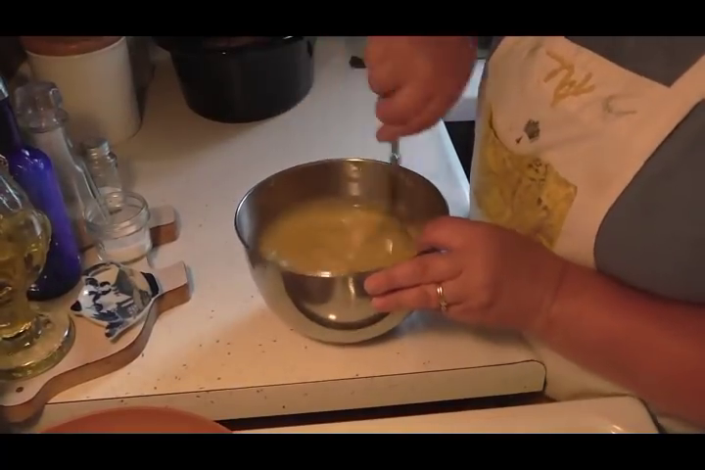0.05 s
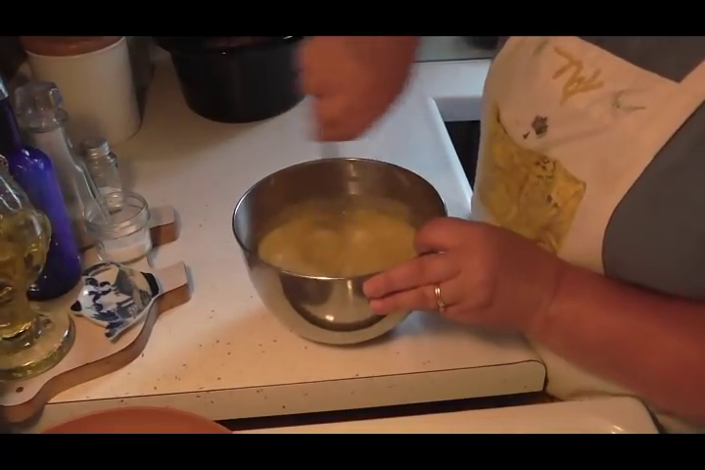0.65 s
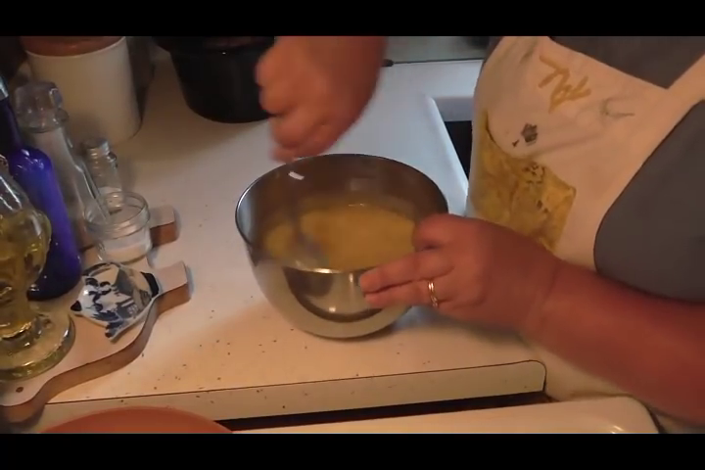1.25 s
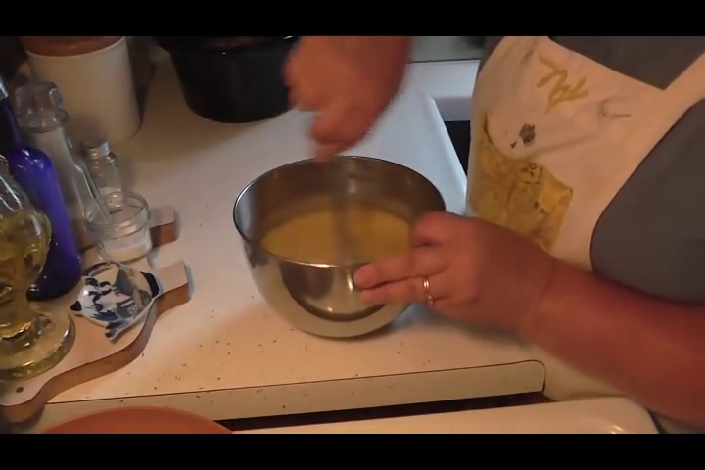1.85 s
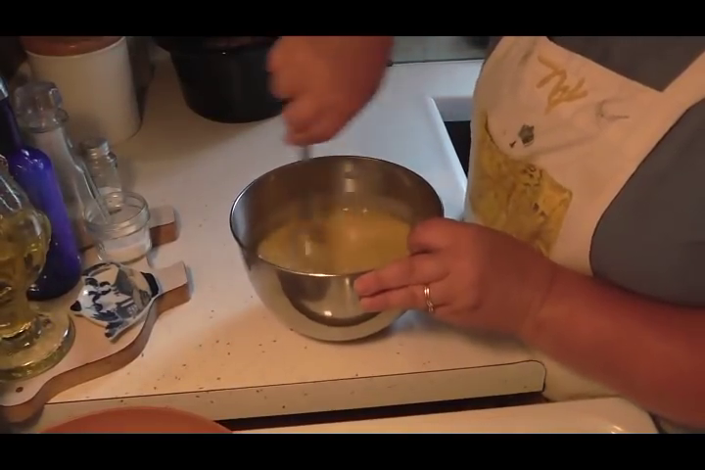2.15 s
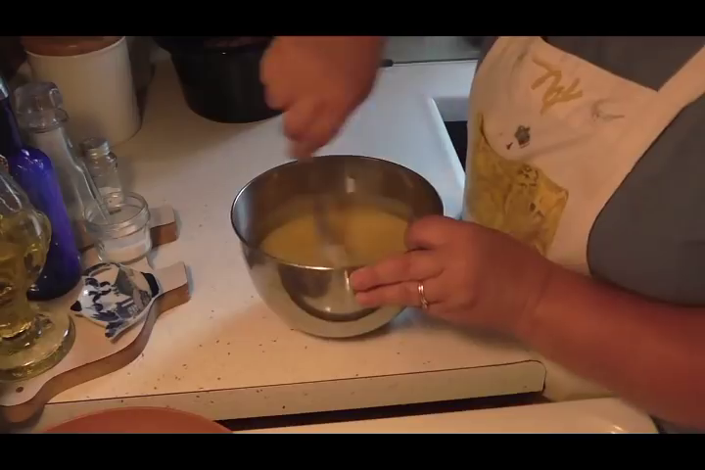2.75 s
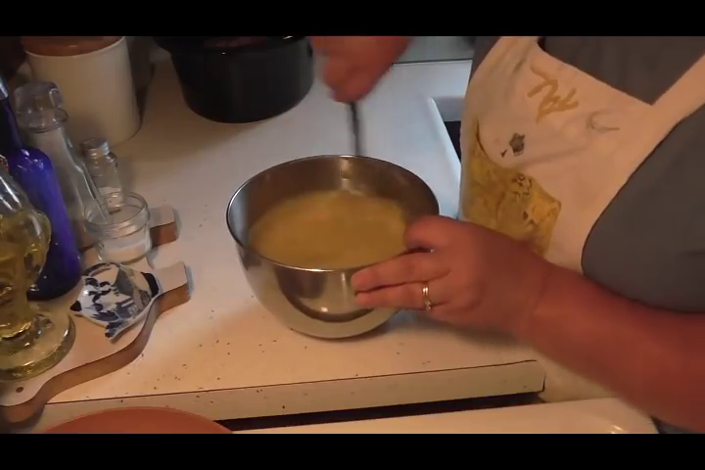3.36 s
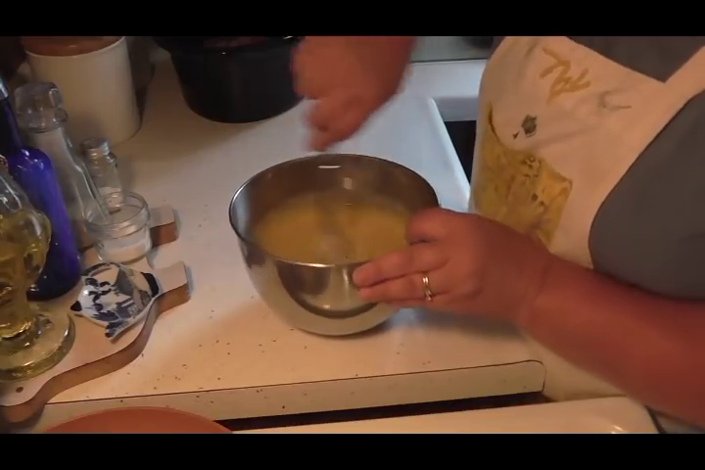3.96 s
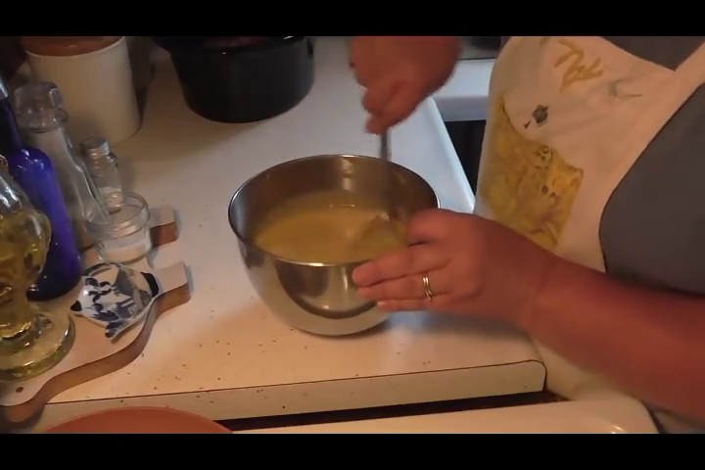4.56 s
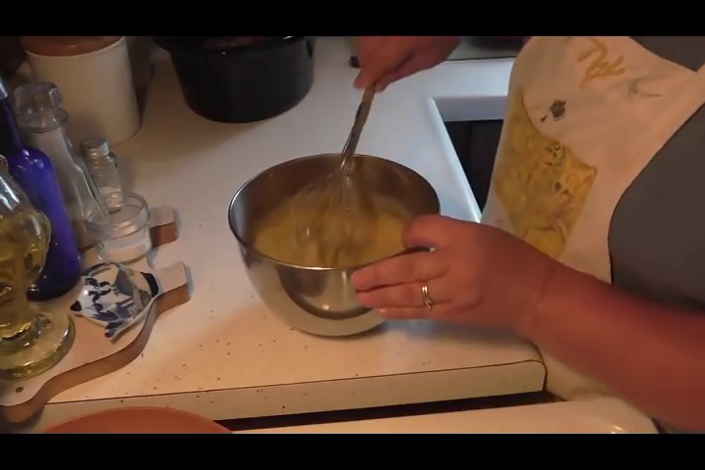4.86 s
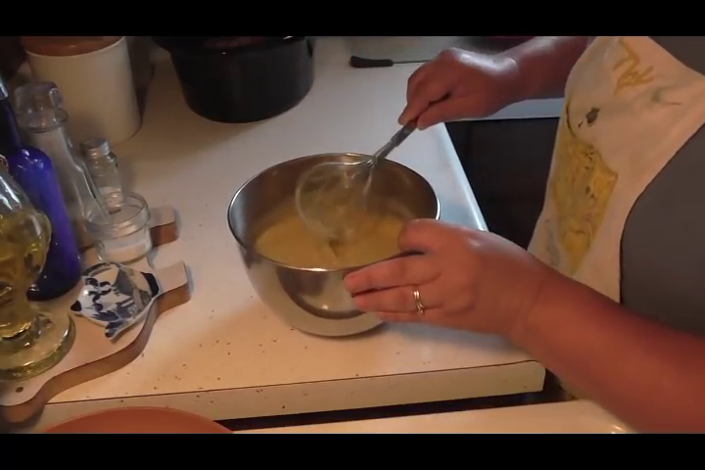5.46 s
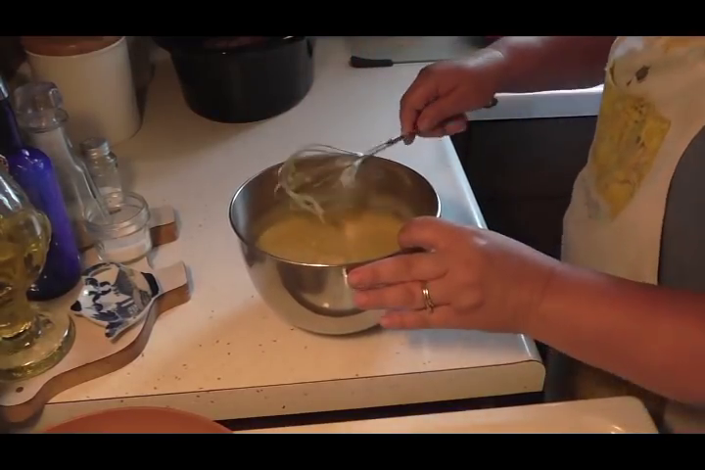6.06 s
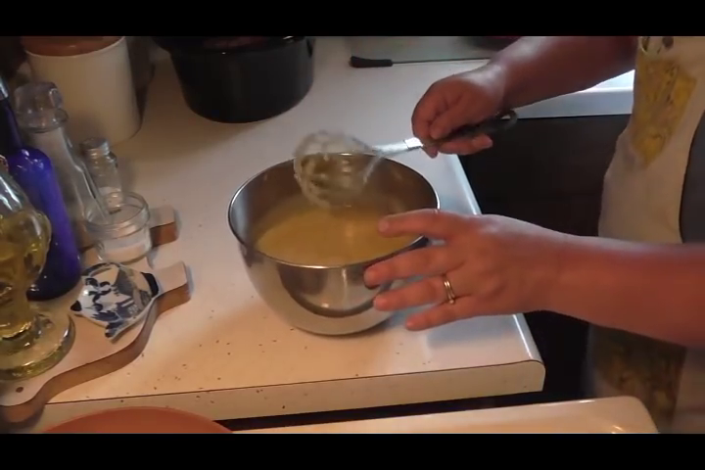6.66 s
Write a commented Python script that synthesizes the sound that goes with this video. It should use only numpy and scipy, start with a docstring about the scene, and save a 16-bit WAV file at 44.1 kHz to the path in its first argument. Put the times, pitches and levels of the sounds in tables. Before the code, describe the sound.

Quick, rhythmic clashes and skids of a wire whisk inside a steel bowl mix with wet splatter, small plops and low thuds of the bowl rocking on a worktop. After nearly five seconds the whisking ends, giving way to bright, briefly ringing taps on the rim and a faint metal squeak. The sound is close and in stereo, in a small kitchen with a soft appliance hum and rush of air.

```python
"""A small, bright kitchen, with a stereo microphone close to a steel bowl held on the counter.
A wire whisk beats thin sauce, about nine strokes a second: the wires clash and skid on the wall,
the sauce slops and bubbles, and the bowl knocks on the worktop. Then the whisk is lifted and tapped
on the rim to shed its drips, with one faint squeak of steel. An appliance hums in the background."""
import sys
import numpy as np
from scipy import signal
from scipy.fft import rfft, irfft, next_fast_len
from scipy.io import wavfile
from scipy.ndimage import uniform_filter1d

SR = 44100
rng = np.random.default_rng(int(sys.argv[2]) if len(sys.argv) > 2 else 0)


def file_out(sig):
    """Save sig as 16-bit WAV at sys.argv[1]."""
    # one column per channel
    cols = np.atleast_2d(sig).T
    # limit, then scale
    lim = np.clip(cols, -1, 1)
    pcm = np.round(lim * 32767).astype(np.int16)
    wavfile.write(sys.argv[1], SR, pcm)


N = 295238
TIME = np.arange(N) / SR

# the stereo image, width: freq_hz, side_gain_db
STEREO_WIDTH = [(60, -19), (250, -18), (550, -12), (1200, -14), (4500, -15), (8500, -7), (12000, -4.5)]
# the stereo image, balance: freq_hz, left_minus_right_db
STEREO_BALANCE = [(60, 1.9), (125, 1.9), (250, -1.5), (500, -2.1), (1000, -.4), (4000, 0), (8000, -2.2),
                  (12000, -4.9)]
# tones of the appliance: pitch_hz, rms_db
HUM_TONES = [(59.6, -59), (119, -52), (479, -67), (560, -68), (1443, -68)]
# spectrum of the rush of air: freq_hz, gain_db
AIR_COLOUR = [(15, -50), (25, -17), (64, -20.5), (90, -11), (131, -4), (264, -17.5), (326, -15), (879, -20),
              (952, -28), (1280, -21.5), (1460, -25), (2240, -36.5), (2560, -45), (3010, -42.5),
              (15000, -53)]
# modes of the bowl with its sauce, on the worktop: pitch_hz, level_db, t60_s
BOWL_MODES = [(124, -8.5, .14), (172, -7, .1), (209, 0, .14), (340, -15, .07), (441, -3, .14),
              (545, -14, .12), (680, -14, .09), (848, -23, .1), (1330, -24, .08), (1490, -31, .15)]
# firm knocks of the bowl on the worktop: start_s, level_db, hardness_db
BOWL_KNOCKS = [(0.219, -13, -6), (0.298, -13.5, -10.0), (0.415, -22.5, -6.5), (0.519, -16.0, -7),
               (0.641, -25, -20), (0.855, -23.5, -16), (0.94, -28.5, -11), (1.077, -27.5, -9.5),
               (1.188, -26, -9.5), (1.293, -22.5, -15), (1.399, -23.5, -12), (1.522, -16.5, -6),
               (1.569, -25, -7), (1.724, -22, -14.5), (1.931, -23.5, -5.5), (2.042, -27, -20.5),
               (2.145, -24, -11), (2.379, -23.5, -15), (2.487, -24.5, -19), (2.561, -19, -12.5),
               (2.615, -29, -13), (2.757, -27, -6.5), (2.805, -27, -14.0), (2.995, -23.5, -14.5),
               (3.339, -32, -9.5), (3.635, -33, -12), (3.77, -21, -5), (3.799, -21.5, -13.5),
               (3.884, -30, -10), (4.005, -22, -9), (4.124, -27, -9), (4.188, -29.5, -9),
               (4.245, -20.5, -12), (4.412, -28.5, -13), (4.452, -27.5, -8.5), (4.66, -27.5, -2.5),
               (4.699, -28.5, 0), (4.821, -30.5, -12.5), (4.95, -33, -3.5), (5.074, -21.5, -10.5),
               (5.327, -25, -16), (5.857, -25.5, -20), (6.02, -23, -14.5), (6.459, -26.0, -18)]
# spectrum of the small bubbles: freq_hz, gain_db
BUBBLE_COLOUR = [(250, 3), (550, -5), (950, -8), (1320, 8), (1750, -24.5), (2150, 6), (2700, -10),
                 (5000, -16)]
# spectrum of the wet splatter: freq_hz, gain_db
SPLATTER_COLOUR = [(250, 3.5), (600, 2.5), (950, -1), (1450, 10.5), (2150, -10.5), (2650, -9), (3400, 2.5),
                   (6000, -24)]
# large air pockets closing in the sauce: start_s, level_db, pitch_hz
AIR_POCKETS = [(0.187, -21.5, 1665), (0.389, -26, 1290), (0.492, -27, 1290), (0.61, -24, 1280),
               (2.099, -25, 1490), (2.146, -29, 1290), (2.262, -27, 1190), (2.274, -27.5, 2100),
               (2.585, -22, 1220), (2.923, -23.5, 1730), (4.249, -30, 770), (4.483, -21.5, 775),
               (4.952, -31, 830)]
# modes of the free whisk against the rim: pitch_hz, level_db, t60_s
WHISK_MODES = [(1110, -12, .25), (1330, -12, .25), (1488, -6, .34), (4040, -10, .27), (4690, -12, .2),
               (5200, -10, .16), (5343, -8, .14), (5476, -3, .16), (5682, -10, .16), (5970, -9, .22),
               (6250, -11, .2), (6663, -8, .22), (6988, -5, .22), (7145, -6, .22), (7400, -8, .2),
               (7807, -5, .22), (7935, -3, .25), (8180, -8, .22), (8490, -4, .21), (8750, 0, .3),
               (8800, -2, .27), (8950, -7, .2), (9640, -10, .3), (10750, -18, .22), (11700, -23, .2),
               (12700, -26, .2)]
# spectrum of bare steel on the rim: freq_hz, gain_db
RIM_COLOUR = [(500, 4), (1400, -11), (2700, -34), (4200, -11), (5500, 6), (6300, -4.5), (8700, 6.5),
              (10200, -20), (12500, -12.5), (16000, -34)]
# the wires squeaking over the rim: time_s, level_db, slip_rate_hz
RIM_SLIDE = [(6.2, -77, 703), (6.271, -49.5, 680), (6.309, -47, 753), (6.36, -52.5, 750),
             (6.45, -54.5, 724), (6.5, -76, 703)]
# taps on the rim and their rebounds: start_s, relative_db, brightest_hz
RIM_TAPS = [(5.3367, -13.5, 7900), (5.4584, -16, 8900), (5.508, -28.5, 8900), (5.6001, -15, 8750),
            (5.619, -19, 9300), (5.7431, -13.5, 8700), (5.7827, -32, 8800), (5.89, -13.5, 8600),
            (5.9283, -24.5, 9000), (6.0389, -12.5, 6000), (6.066, -25, 7700), (6.113, -34, 6830),
            (6.5647, -26.5, 8600), (6.599, -34, 8700), (6.6846, -20, 8500)]
# spectrum of the wires on the wall: freq_hz, gain_db
WIRE_COLOUR = [(500, -51), (1300, -9), (2650, -17.5), (3700, -8), (4900, 0.5), (6500, -2), (8600, -2),
               (10000, -11), (12500, -17.5), (16000, -40)]
# spectrum of the midrange bite of a clash deep in the sauce: freq_hz, gain_db
BITE_COLOUR = [(900, -17), (1500, 6), (2100, -0.5), (2650, -19.5), (3500, 9.5), (4800, -10)]
# the whisk circling between strokes until it is lifted out: time_s, wires_relative_db, sauce_relative_db
STIRRING = [(0.0, -29, -32.5), (0.36, -43, -51.5), (0.85, -37.5, -40.5), (1.68, -39, -40.5),
            (2.1, -36, -43), (2.36, -41.5, -42), (2.78, -37.5, -47.5), (3.08, -47, -56), (3.36, -39, -56),
            (3.91, -39, -45), (4.3, -36.5, -41), (4.56, -43.5, -43), (4.81, -58, -50), (5.2, -65, -62)]
# at each stroke the wires land on the wall, skid along it and strike again as they leave:
# start_s, skid_s, landing_db, leaving_db, brightest_hz, scrape_db, sauce_db
WHISK_STROKES = [(0.047, 0.033, -23, -23.5, 7000, -39, -48.5), (0.1823, 0.03, -22.5, -39, 7600, -36.5, -37),
                 (0.2796, 0.028, -25, -25, 8400, -36, -36.5), (0.3878, 0.01, -26, -19, 5000, -29, -30),
                 (0.4915, 0.023, -24, -23, 5950, -36, -42), (0.6093, 0.01, -20, -27, 5130, -34, -33.5),
                 (0.704, 0.028, -23.5, -19, 8500, -38.5, -37),
                 (0.826, 0.013, -23.0, -29, 4670, -34.5, -35.5), (0.924, 0.033, -31, -22, 6270, -33, -44),
                 (1.053, 0.024, -22.5, -32, 7100, -37, -38), (1.143, 0.037, -32.5, -20.5, 5540, -38, -46),
                 (1.266, 0.016, -27, -23, 7100, -41, -36.5), (1.3602, 0.01, -25.5, -38, 5640, -44, -50),
                 (1.397, 0.023, -24.0, -22.5, 6540, -46, -49.5), (1.499, 0.02, -21, -37, 5000, -39, -39),
                 (1.5977, 0.022, -30.5, -22.5, 5650, -39, -36.5),
                 (1.7095, 0.012, -21.5, -33, 4880, -37.5, -36.5),
                 (1.8026, 0.029, -29, -21, 6300, -37.5, -42.5),
                 (1.926, 0.039, -21.5, -30, 6730, -39.5, -34), (1.9913, 0.019, -25, -25, 6500, -52, -56),
                 (2.0375, 0.012, -34, -26, 6550, -42.5, -39.5),
                 (2.1397, 0.015, -24.5, -31, 5700, -34.5, -37), (2.232, 0.03, -45, -22, 5000, -36.5, -38),
                 (2.355, 0.015, -23.5, -37, 6300, -34.5, -39), (2.4932, 0.01, -25.0, -53, 6600, -51, -39),
                 (2.5706, 0.014, -32.5, -25.0, 4700, -39, -38), (2.6293, 0.01, -30, -27.5, 7000, -50, -38),
                 (2.696, 0.015, -26, -27.5, 6470, -48, -37.5), (2.8006, 0.01, -21.5, -19, 4600, -48, -36.5),
                 (2.9218, 0.02, -27, -44, 3880, -44.5, -35), (3.0274, 0.01, -24, -32, 5800, -44, -36.5),
                 (3.1367, 0.03, -27.5, -25, 5700, -62, -50.5),
                 (3.2995, 0.022, -30.5, -33.5, 5700, -32.5, -58),
                 (3.4897, 0.055, -33.5, -37, 6330, -57, -46), (3.588, 0.015, -30, -45, 7900, -50, -47.5),
                 (3.6794, 0.015, -29.5, -36, 5200, -47, -45.5), (3.761, 0.013, -52, -33, 5900, -41, -34),
                 (4, 0.015, -27.5, -31, 4950, -40, -35), (4.133, 0.01, -19, -46, 5960, -52, -40),
                 (4.223, 0.021, -30.5, -32, 5300, -34.5, -37), (4.3573, 0.01, -19, -46, 6200, -49, -34),
                 (4.449, 0.025, -31, -31, 4920, -35, -40.5), (4.58, 0.012, -26.5, -21.5, 4570, -47, -34),
                 (4.6843, 0.02, -27, -30, 5400, -35.5, -39.5)]


def amp(db):
    """Decibels to gain."""
    return 10 ** (np.asarray(db) / 20)


def unit(x):
    """Scale to rms 1."""
    return x / np.sqrt(np.mean(x ** 2))


def crest(x, size):
    """Scale a blow so that its loudest stretch of size samples has rms 1."""
    return x / np.sqrt(uniform_filter1d(x ** 2, size, mode="constant").max())


def clock(seconds):
    """Sample times of a short sound."""
    return np.arange(int(seconds * SR)) / SR


def decay(t, t60):
    """Gain that falls 60 dB in t60 seconds."""
    return np.exp(-np.log(1000) * t / t60)


def follow(table, column):
    """Gain along a table's dB column, timed by its first column and silent outside it."""
    rows = np.array(table)
    return amp(np.interp(TIME, rows[:, 0], rows[:, column], left=-120, right=-120))


def add(track, start_s, x):
    """Mix x into the track at start_s."""
    i = int(np.clip(start_s * SR, 0, N - 1))
    track[i:i + len(x)] += x[:N - i]


def colour(x, points):
    """Filter by a spectrum of (freq_hz, gain_db) points."""
    size = next_fast_len(len(x) + 2048)
    hz, db = np.transpose(points)
    bins_hz = np.maximum(np.fft.rfftfreq(size, 1 / SR), 1)
    gain = amp(np.interp(np.log(bins_hz), np.log(hz), db))
    return irfft(rfft(x, size) * gain, size)[:len(x)]


def resonate(x, hz, width_hz):
    """One resonance, gain 1 at its centre."""
    return signal.lfilter(*signal.iirpeak(min(hz, SR / 3), max(hz / width_hz, 1), fs=SR), x)


def burst(t, t60):
    """Noise dying away: a crowd of modes too dense to tell apart."""
    return rng.standard_normal(len(t)) * decay(t, t60)


def ring(t, modes, detune, scatter_db, spread_turns=0):
    """Struck modes, a row each; the contact point shifts pitch and strength, a buzzing contact phase."""
    hz, db, t60 = np.transpose(modes)[:, :, None]
    pitch, size, start = rng.standard_normal((3, len(modes), 1))
    cycles = hz * (1 + detune * pitch) * t + spread_turns * start
    return amp(db + scatter_db * size) * np.sin(2 * np.pi * cycles) * decay(t, t60)


def ticks(samples, per_s, spread_db):
    """Random tiny impacts, mostly small, a few large."""
    struck = rng.random(samples) < per_s / SR
    size = np.minimum(rng.exponential(size=samples), 4)
    return struck * amp(spread_db * size) * rng.choice([-1, 1], samples)


def swells(levels_db, attack_s, hold_s, t60):
    """Gain that rises into each stroke, holds through the skid and hold_s more, then dies away."""
    power, t = np.zeros(N), clock(.4)
    for (start_s, skid_s, *_), db in zip(WHISK_STROKES, levels_db):
        rise = np.minimum(t / attack_s, 1)
        fall = decay(np.maximum(t - attack_s - skid_s - hold_s, 0), t60)
        add(power, start_s - attack_s, (amp(db) * rise * fall) ** 2)
    return np.sqrt(power)


def reflections(x):
    """Quick scatter off nearby things, then the fainter tail of the room, at unit power gain."""
    t = clock(.45)
    response = burst(t, t60=.025) + amp(-12) * burst(t, t60=.22)
    return signal.fftconvolve(x, response / np.linalg.norm(response))[:N]


def kitchen(direct):
    """A short bright room; as the whisk circles, other reflections reach the microphone's two ports."""
    t = clock(.51)
    tail = burst(t, t60=.26) * (1 - np.exp(-t / .0027))
    mid = direct + amp(-8.5) * signal.fftconvolve(direct, tail / np.linalg.norm(tail))[:N]
    turn = 2 * np.pi * 4 * TIME  # four turns a second
    scatter = reflections(mid * np.cos(turn)) + reflections(mid * np.sin(turn))
    # the pressure difference between the ports is in quadrature
    across = signal.hilbert(mid, next_fast_len(N)).imag[:N]
    side = colour(.9 * scatter + .4 * across, STEREO_WIDTH)
    left = colour(mid + side, [(hz, db / 2) for hz, db in STEREO_BALANCE])
    right = colour(mid - side, [(hz, -db / 2) for hz, db in STEREO_BALANCE])
    return np.array([left, right])


def appliance():
    """Mains hum and a steady rush of air in the background."""
    hum = sum(amp(db) * np.sqrt(2) * np.sin(2 * np.pi * (hz * TIME + rng.random()))
              for hz, db in HUM_TONES)
    return hum + amp(-47.5) * unit(colour(rng.standard_normal(N), AIR_COLOUR))


def bowl_shudder(motion):
    """The push of the strokes keeps the bowl shuddering between knocks."""
    force = ticks(N, per_s=700, spread_db=4.5) * motion
    modes = sum(amp(.7 * db) * resonate(force, hz, width_hz=2.94 / t60) for hz, db, t60 in BOWL_MODES)
    return amp(-46) * unit(modes)


def bowl_landings():
    """Firm knocks, and light ones after each stroke and tap: start_s, level_db, hardness_db."""
    chance = rng.standard_normal((len(WHISK_STROKES), 2))
    after_strokes = [(start_s + skid_s + .022 * np.exp(.5 * late), -34.5 + 2 * size, -13)
                     for (start_s, skid_s, *_), (late, size) in zip(WHISK_STROKES, chance)]
    after_taps = [(start_s + .02, db - 13, -10.5) for start_s, db, _ in RIM_TAPS]
    return list(BOWL_KNOCKS) + after_strokes + after_taps


def bowl_knocks():
    """The bowl rocks onto the worktop; a harder landing wakes the upper modes and chatters."""
    out, t = np.zeros(N), clock(.22)
    upper = np.array(BOWL_MODES)[:, 0] > 300
    build = 1 - np.exp(-t / .0032)  # the liquid load lets the swing build gradually
    for start_s, db, hardness_db in bowl_landings():
        modes = ring(t, BOWL_MODES, detune=.02, scatter_db=3)
        thud = resonate(resonate(burst(t, t60=.12), 185, width_hz=90), 165, width_hz=50)
        chatter = resonate(resonate(burst(t, t60=.19), 400, width_hz=390), 533, width_hz=580)
        low = crest(modes[~upper].sum(0), size=256) + amp(-7.5) * crest(thud, size=256)
        high = crest(modes[upper].sum(0), size=256) + amp(-7) * crest(chatter, size=256)
        add(out, start_s, amp(db) * crest(build * (low + amp(hardness_db) * high), size=256))
    # so small a bowl radiates little below its lowest mode, and the dull landing wakes no treble
    return signal.sosfilt(signal.butter(4, [114, 1900], "band", fs=SR, output="sos"), out)


def sauce_motion():
    """How hard the sauce moves: a surge with each stroke over the steady swirl."""
    surges = swells([sauce_db for *_, sauce_db in WHISK_STROKES], attack_s=.006, hold_s=.0027, t60=.28)
    return np.hypot(surges, amp(-2.5) * follow(STIRRING, column=2))


def sauce_slop(motion):
    """The wires tear air into the sauce: short rising bubbles over a wet splatter."""
    bubbles, t = np.zeros(N), clock(.04)
    for when, pitch, size, life in rng.random((1100, 4)):
        hz = 650 * 3.8 ** pitch
        t60 = (9 + 28 * life) / hz  # a bubble rings for 9 to 37 cycles
        phase = 2 * np.pi * hz * t * (1 + .047 * t / t60)
        add(bubbles, when * TIME[-1], amp(20 * size) * np.sin(phase) * decay(t, t60))
    splatter = colour(ticks(N, per_s=2200, spread_db=1), SPLATTER_COLOUR)
    wet = amp(-6.5) * unit(colour(bubbles, BUBBLE_COLOUR)) + amp(-5) * unit(splatter)
    return signal.sosfilt(signal.butter(2, 220, "high", fs=SR, output="sos"), wet) * motion


def sauce_plops():
    """Each air pocket rings like a bubble and rises in pitch as it nears the surface."""
    out, t = np.zeros(N), clock(.06)
    swell = (1 - np.exp(-t / .0021)) * decay(t, t60=.039)
    for start_s, db, hz in AIR_POCKETS:
        add(out, start_s, amp(db) * swell * np.sin(2 * np.pi * hz * t * (.96 + 3 * t)))
    return out


def rim_squeak():
    """Uneven stick-slip on the rim: a faint squeak that rises and sinks, and keeps the whisk singing."""
    times, _, slip_hz = np.transpose(RIM_SLIDE)
    wobble = unit(uniform_filter1d(rng.standard_normal(N), size=150))
    cycles = np.cumsum(np.interp(TIME, times, slip_hz) * (1 + .011 * wobble)) / SR
    squeak = unit(sum(np.cos(2 * np.pi * harmonic * cycles) for harmonic in range(8, 17)))
    grip = amp(3.7 * unit(uniform_filter1d(rng.standard_normal(N), size=900)))  # wires catch and let go
    slips = colour(unit(squeak * grip) + 1.1 * rng.standard_normal(N), RIM_COLOUR)
    singing = sum(resonate(slips, hz, width_hz=90) for hz, _, _ in WHISK_MODES)
    return unit(slips + .3 * singing) * follow(RIM_SLIDE, column=1)


def rim_taps():
    """Out of the sauce the whisk buzzes on the rim, which broadens its modes; then they ring freely."""
    out, t = np.zeros(N), clock(.28)
    for start_s, db, brightest_hz in RIM_TAPS:
        contact = burst(t, t60=.028) + amp(-24) * burst(t, t60=.19)
        buzz = sum((-1) ** k * amp(mode_db) * resonate(contact, hz, width_hz=150)
                   for k, (hz, mode_db, _) in enumerate(WHISK_MODES))
        crack = colour(contact, RIM_COLOUR)
        tone = ring(t, WHISK_MODES, detune=.0013, scatter_db=3.5, spread_turns=1).sum(0)
        tone *= 1 - np.exp(-t / .00072)
        # the point of contact favours some modes
        tone = 1.2 * tone + resonate(tone, brightest_hz, width_hz=2800)
        steel = crest(buzz, size=128) + amp(.5) * crest(crack, size=128)
        steel += amp(-19) * crest(tone, size=128)
        steel += 1.5 * resonate(steel, brightest_hz, width_hz=1200)
        add(out, start_s, amp(db) * crest(steel, size=128))
    return amp(-5.5) * out


def wire_scrape():
    """Wires stick and slip along the wall; each patch of contact rings with its own set of modes."""
    out, patch = np.zeros(N), np.hanning(2400)
    for i in range(0, N, len(patch) // 2):
        slips = ticks(len(patch), per_s=1300, spread_db=4.5) * np.sqrt(patch)
        steel = colour(signal.fftconvolve(slips, burst(clock(.02), t60=.023)), WIRE_COLOUR)
        add(out, i / SR - .015, unit(steel))
    skids = swells([scrape_db for *_, scrape_db, _ in WHISK_STROKES], attack_s=.021, hold_s=.014, t60=.14)
    return unit(out) * np.hypot(skids, amp(-5.5) * follow(STIRRING, column=1))


def wire_hits():
    """Each blow of a wire on the wall: start_s, level_db, brightest_hz, scrape_db, sauce_db."""
    hits = []
    for start_s, skid_s, landing_db, leaving_db, *setting in WHISK_STROKES:
        hits += [(start_s, landing_db, *setting), (start_s + skid_s, leaving_db, *setting)]
    # one stray wire ticks at random between each pair of strokes
    times, wires, swirl = np.transpose(STIRRING)
    for (start_s, *_), (next_s, _, _, _, brightest_hz, *_) in zip(WHISK_STROKES, WHISK_STROKES[1:]):
        stray_s = start_s + (next_s - start_s) * rng.uniform(.3, .9)
        wires_db, sauce_db = np.interp(stray_s, times, wires), np.interp(stray_s, times, swirl)
        stray_db = wires_db + 6 + 2.5 * rng.standard_normal()
        hits.append((stray_s, stray_db, brightest_hz, wires_db - 8, sauce_db))
    return hits


def wire_clashes():
    """One wire lands and its neighbours clatter after it; deep in the sauce the wall answers lower."""
    out, t = np.zeros(N), clock(.085)
    graze = int(.01 * SR)  # the outer wires graze the wall just before the blow
    for start_s, db, brightest_hz, scrape_db, sauce_db in wire_hits():
        clatter_s = .024 * np.exp(.1 * (scrape_db - db))  # longer when soft against the scraping
        bite_db = -8 + .63 * (sauce_db - db) + rng.standard_normal()  # more sauce, more midrange
        clatter = np.exp(-t[:-graze] / max(clatter_s, .002))
        pressure = np.concatenate([np.linspace(0, .15, graze), clatter])
        contacts = ticks(len(t), per_s=1900, spread_db=2.5) * pressure
        contacts[graze] = 2.05  # the blow itself
        rattle = signal.fftconvolve(contacts, burst(t, t60=.03))[:len(t)]
        steel = colour(rattle, WIRE_COLOUR)
        steel = unit(steel + 1.1 * resonate(steel, brightest_hz, width_hz=800))
        bite = amp(bite_db) * unit(colour(rattle, BITE_COLOUR))
        add(out, start_s - graze / SR, amp(db) * crest(steel + bite, size=128))
    return out


def scene():
    """Whisk, sauce and bowl close to the microphone, with the appliance behind them."""
    motion = sauce_motion()
    whisk = wire_clashes() + wire_scrape() + rim_taps() + rim_squeak()
    sauce = sauce_slop(motion) + sauce_plops()
    bowl = bowl_knocks() + bowl_shudder(motion)
    return kitchen(whisk + sauce + bowl + appliance())


def record(dry):
    """The recorder drops the rumble below 32 Hz and cuts the top steeply at 15.9 kHz."""
    low_cut = signal.butter(2, 32, "high", fs=SR, output="sos")
    high_cut = signal.ellip(10, .2, 80, 15900, fs=SR, output="sos")
    return signal.sosfilt(high_cut, signal.sosfilt(low_cut, dry))


dry = scene()
out = record(dry)
file_out(out)
```